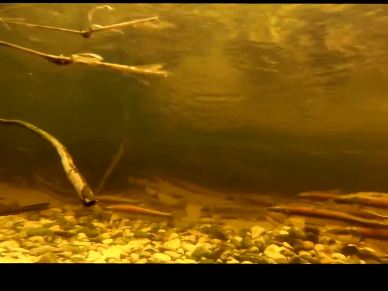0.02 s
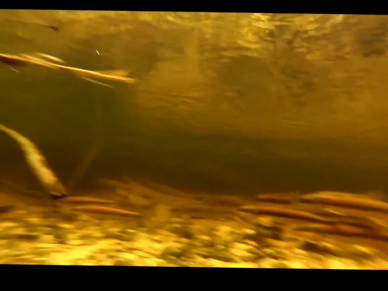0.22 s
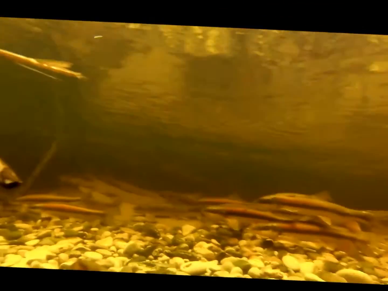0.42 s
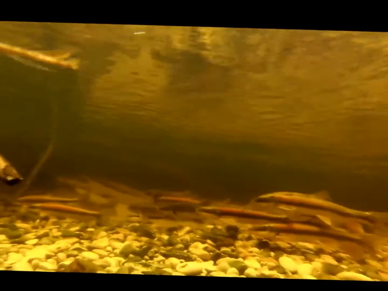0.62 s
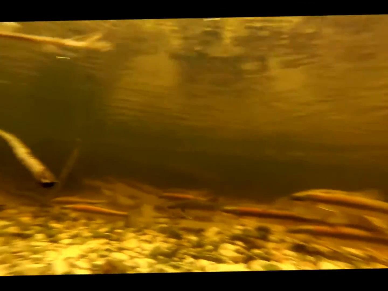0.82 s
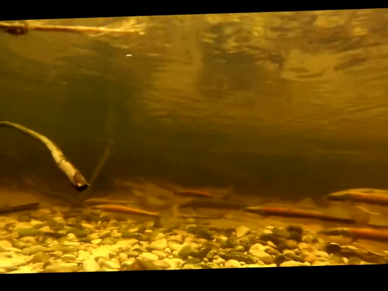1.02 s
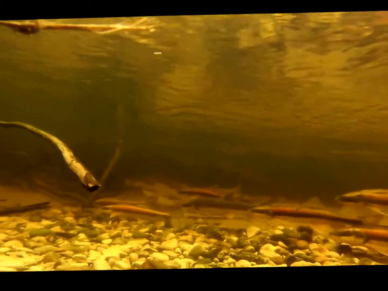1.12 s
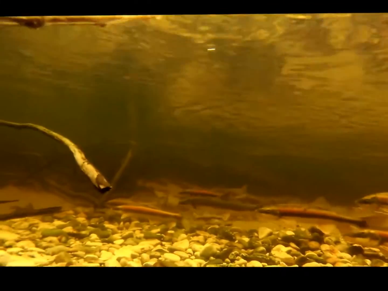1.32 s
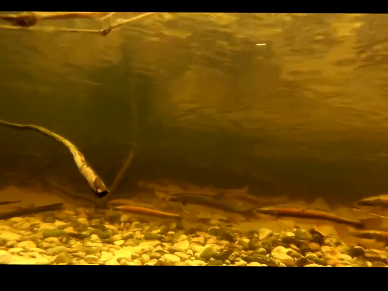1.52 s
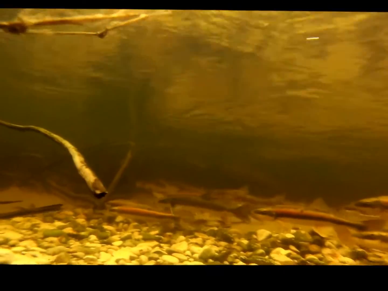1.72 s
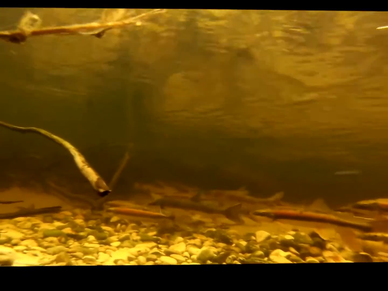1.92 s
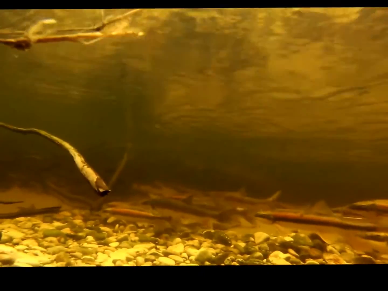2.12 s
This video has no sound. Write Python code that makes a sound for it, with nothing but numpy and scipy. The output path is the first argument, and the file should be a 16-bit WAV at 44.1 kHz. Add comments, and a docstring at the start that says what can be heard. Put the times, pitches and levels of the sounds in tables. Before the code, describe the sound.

Gravel grinds against a microphone case underwater on a creek bed. After a quiet start, sharp pebble knocks and small bubble blips come at about 0.25 seconds, followed by brief scraping. A denser, gritty crunch swells from 0.8 to 1 second, then eases into scattered ticks. A hard knock at 1.7 seconds starts more grinding, fading after 2 seconds. Low water rumble and faint hiss lie underneath.

```python
"""On the gravel bed of a creek, a camera in a watertight case shifts in the current.
Gravel grinds against the case in three surges, pebbles knock on it and sand grains tick.
Each contact is an impulse, coloured by the resonances of the case and smeared by its wall.
Small bubbles ring as damped oscillators, over the low rumble of the water and a faint hiss."""
import sys
import numpy as np
from scipy import signal
from scipy.fft import rfft, irfft
from scipy.io import wavfile
from scipy.ndimage import uniform_filter1d, minimum_filter1d

SR = 44100
rng = np.random.default_rng(int(sys.argv[2]) if len(sys.argv) > 2 else 0)


def file_out(sig):
    """Save sig as 16-bit WAV at sys.argv[1]."""
    # one column per channel
    cols = np.atleast_2d(sig).T
    # limit, then scale
    lim = np.clip(cols, -1, 1)
    pcm = np.round(lim * 32767).astype(np.int16)
    wavfile.write(sys.argv[1], SR, pcm)


N = 97020
TAPS = 4096  # samples in one contact or bubble
HZ, AGE, TIME = np.fft.rfftfreq(TAPS, 1 / SR), np.arange(TAPS) / SR, np.arange(N) / SR
BASS_HZ, TREBLE_HZ = 740, 2960
TREBLE_OCTAVES = np.log2(np.maximum(HZ / TREBLE_HZ, 1))

# surges of grinding (time [s], coarse grain level [dB], fine grit level [dB])
SURGES = [(0, -48.5, -83), (.05, -50.5, -82), (.11, -57.5, -74), (.18, -45.5, -68), (.23, -32.5, -50.5),
          (.37, -29, -51), (.43, -37.5, -63.5), (.47, -45, -57), (.59, -47.5, -66), (.64, -38, -52.5),
          (.73, -40, -56), (.80, -26, -39.5), (.84, -27, -42), (.90, -28.5, -37.5), (.95, -34.5, -64),
          (1.03, -48.5, -64.5), (1.1, -49, -71), (1.19, -37.5, -57.5), (1.26, -46.5, -62), (1.34, -49, -65),
          (1.42, -38.5, -63.5), (1.48, -42, -58), (1.55, -45, -62), (1.605, -41, -54.5), (1.66, -49.5, -69),
          (1.71, -30, -46.5), (1.745, -39, -58), (1.80, -29.5, -50), (1.84, -36.5, -55),
          (1.89, -30.5, -48.5), (1.96, -40.5, -61), (2.05, -46, -61.5), (2.12, -55.5, -66),
          (2.2, -47.5, -69)]
# response of the case to a hard contact (frequency [Hz], level [dB])
CASE_RESPONSE = [(30, -28.5), (190, -6.5), (300, -6), (420, 0.5), (540, -1), (660, 0.5), (920, -4.5),
                 (1110, -2), (1350, -7.5), (1610, 0.5), (1870, -6), (2200, -2.5), (2380, -7), (2580, -17.5),
                 (3000, -17), (3500, -20.5), (4600, -37.5), (5200, -31.5), (6000, -48), (6600, -37.5),
                 (9000, -59.5), (16000, -84)]
# response of the case to sand (frequency [Hz], level [dB])
SAND_RESPONSE = [(300, -22), (2500, 3), (3500, 7.5), (4600, -7), (5200, 2.5), (5950, -5.5), (6550, 1),
                 (7100, -4.5), (7600, -2.5), (8600, -12.5), (9700, -3.5), (10700, -12), (11900, -9),
                 (13200, -23), (14300, -19), (16000, -25)]
# lasting modes of the case (frequency [Hz], level [dB], t60 [s])
CASE_MODES = [(396.3, -6.5, 0.083), (488, -5.5, 0.14), (629, -3.5, 0.058), (810, -6, 0.033),
              (1075, -0.5, 0.069), (1139, 1, 0.027), (1607, -5.5, 0.042), (2180, -2, 0.032),
              (3450, -5.5, 0.019)]


def amp(db):
    """Decibels to amplitude ratio."""
    return 10 ** (np.asarray(db) / 20)


def unit_rms(x):
    """Normalisation to rms 1."""
    return x / np.sqrt(np.mean(x ** 2) + 1e-20)


def colour(points, hz=HZ):
    """A spectrum in dB, interpolated over log frequency."""
    f, db = np.transpose(points)
    return np.interp(np.log(hz + 1), np.log(f + 1), db)


def envelope(table, column=1):
    """An amplitude envelope, interpolated in dB."""
    columns = np.transpose(table)
    return amp(np.interp(TIME, columns[0], columns[column]))


def add(mix, s, sound):
    """Superposition: a sound joins the mix at s seconds."""
    part = mix[max(round(s * SR), 0):][:len(sound)]
    part += sound[:len(part)]


def click(db):
    """Minimum phase gives the shortest causal pulse with this spectrum; peak 1."""
    log_gain = np.log(amp(np.r_[db, db[-2:0:-1]]))
    spectrum = np.exp(np.conj(signal.hilbert(log_gain)))
    pulse = np.fft.ifft(spectrum).real
    return pulse / abs(pulse).max()


def noise(points):
    """Spectral shaping of white noise; rms 1."""
    gain = amp(colour(points, np.fft.rfftfreq(N, 1 / SR)))
    return unit_rms(irfft(rfft(rng.standard_normal(N)) * gain, N))


def case_ring(weights, rise_s=0.00077):
    """Free vibration of the case is a weighted sum of damped modes."""
    modes = sum(weight * amp(db - 60 * AGE / t60) * np.sin(2 * np.pi * hz * AGE)
                for weight, (hz, db, t60) in zip(weights, CASE_MODES))
    return modes * (1 - np.exp(-(AGE / rise_s) ** 2))


def contact_ripple(count=26, spread_db=4):
    """The response varies with the point of contact: a random spectral ripple in dB."""
    return spread_db * colour(np.c_[np.geomspace(150, 16000, count), rng.standard_normal(count)])


def shower(shapes, nominal_per_s, spread_db):
    """Shot noise: randomly drawn shapes arrive faster as the grinding grows louder; rms 1."""
    density = unit_rms(envelope(SURGES) ** .5)
    size = amp(spread_db * np.minimum(rng.exponential(1, N), 3.5)) * rng.choice([-1, 1], N)
    size /= np.sqrt(density)  # keeps mean power independent of the rate
    impulses = size * (rng.random(N) < density * nominal_per_s / SR)
    which = rng.integers(0, len(shapes), N)
    return unit_rms(sum(signal.oaconvolve(impulses * (which == k), shape)[:N]
                        for k, shape in enumerate(shapes)))


def gravel(count=36, ring_db=-24):
    """Friction as many small impacts: coarse grains slip on the case and excite its modes."""
    # colour of coarse grains, added to the case response (frequency [Hz], level [dB])
    grain_colour = [(60, -3), (250, 0.5), (450, -2), (750, 0.5), (1100, 2.5), (1600, -2.5), (2300, 0.5),
                    (3500, -0.5), (7000, -1), (14000, -18)]
    shapes = []
    for _ in range(count):
        contact = click(colour(CASE_RESPONSE) + colour(grain_colour) + contact_ripple())
        ringing = case_ring(rng.standard_normal(len(CASE_MODES)))
        shapes.append(contact + amp(ring_db) * ringing)
    return envelope(SURGES) * shower(shapes, nominal_per_s=3400, spread_db=4)


def grit(count=10, tilt_db_per_octave=-4):
    """Brief impacts have broad spectra: fine grit crackles brightly in the same surges."""
    spectrum_db = colour(SAND_RESPONSE) + tilt_db_per_octave * TREBLE_OCTAVES
    shapes = [click(spectrum_db + contact_ripple()) for _ in range(count)]
    return envelope(SURGES, column=2) * shower(shapes, nominal_per_s=3200, spread_db=8)


def water():
    """Forced and free vibration: the current buffets the case, which rocks after the hardest knocks."""
    # rumble of the water pushing on the case (time [s], level [dB])
    rumble_levels = [(0, -39), (.08, -43), (.19, -47.5), (.245, -32), (.32, -35.5), (.46, -44),
                     (.53, -52.5), (.68, -45.5), (.82, -37), (.92, -36.5), (1.03, -44.5), (1.35, -47.5),
                     (1.66, -45.5), (1.71, -25.5), (1.78, -39), (1.85, -43), (2.03, -40.5), (2.14, -60),
                     (2.2, -43)]
    # spectrum of the rumble (frequency [Hz], level [dB])
    rumble_colour = [(8, -9.5), (25, 1.5), (38, -5), (52, -6), (72, -9.5), (100, -10), (150, -17.5),
                     (300, -27), (1000, -73)]
    # the case rocking on the bed (time [s], level [dB], frequency [Hz], t60 [s])
    rocking = [(0.2464, -21, 55.6, 0.051), (1.705, -29, 29.7, .25)]
    out = envelope(rumble_levels) * noise(rumble_colour)
    for s, db, hz, t60 in rocking:
        add(out, s, amp(db - 60 * TIME / t60) * np.sin(2 * np.pi * hz * TIME))
    return out


def hiss(level_db=-66.5):
    """Stationary broadband noise forms a faint floor."""
    # spectrum of the hiss (frequency [Hz], level [dB])
    hiss_colour = [(100, 12.5), (1500, 5), (4000, -7.5), (7000, -4), (12000, -5.5), (15000, -7),
                   (16000, -24.5)]
    return amp(level_db) * noise(hiss_colour)


def pebbles(cutoff_hz=9000):
    """Impact excitation: soft knocks are bassier, hard ones brighter; a few leave the case ringing."""
    # pebbles striking the case (time [s], level [dB], bass [dB], treble [dB], relative ring [dB])
    knocks = [(.0450, -29, 12.5, -3, -20), (.1260, -37.5, 5, 0, -15), (0.1506, -33, 1, -1.5, -19),
              (0.2216, -14, -5, 1.5, -24.5), (0.2439, -4.5, 14, -2, -36), (0.2454, -4.5, 5, 6.5, -25),
              (.2480, -2, 0.5, 5, -32.5), (0.2512, -8, -6, -22, -11), (0.267, -25, 18, -2, -34.5),
              (0.2893, -10, -24, -6, -16.5), (.2900, 4, 0.5, 0, -30), (0.2944, -10, 4, 13, -13.5),
              (.4372, -13.5, -26, -10, -19), (.6225, -20.5, -4, -3, -29), (0.7587, -15.5, -12.5, -16, -8),
              (.7965, -34, 12.5, 2, -15.5), (0.8236, -12.5, 4, -6, -16), (.8250, -8.5, 3, -4, -15.5),
              (0.8346, -10.5, -10, 2, -11), (0.9278, -13, 3.5, 7, -16.5), (1.0550, -34, -2, 4, -20),
              (1.0603, -32.5, 17, 7, -20), (1.1817, -20, 1, -1, -25), (1.271, -25, 3, -13, -26),
              (1.2939, -29.5, -43, -3, -6), (1.301, -18.5, -3.5, -4, -18), (1.4025, -26, -12, 4, -17),
              (1.4614, -13, 2, 7, -50), (1.4663, -20.5, -17, -5, -19), (1.5925, -26.5, 7, -14, -20),
              (1.6735, -25, 7, 8, -26), (1.6931, 6.5, -0.5, -0.5, -35), (1.6945, -2.5, -5.5, -7, -45.5),
              (1.6975, -14.5, -12, -18, -33), (1.7008, -18, -2, -27, -26), (1.7114, -8.5, 17.5, -20, -30),
              (1.7803, -16.5, -8, 8, -16), (1.7963, -27.5, 8, 2, -4), (1.909, -18.5, -6, -14, -20),
              (1.936, -10, -4.5, -0.5, -33), (1.9424, -13, -0.5, 4, -44), (1.9596, -17.5, -18, -10, -14.5),
              (1.973, -21.5, 9.5, 6, -9.5), (2.018, -22.5, 4, 0, -30), (2.1002, -36, 0, 11, -6.5),
              (2.145, -30, -2.5, -9, -18), (2.177, -28, -3, -3, -35), (2.198, -18, 6.5, -10, -24)]
    out, ringing = np.zeros(N), case_ring(np.ones(len(CASE_MODES)))
    bass_shelf = 1 / (1 + (HZ / BASS_HZ) ** 4)
    treble_shelf = 1 - 1 / (1 + (HZ / TREBLE_HZ) ** 4)
    blunt_db = colour(CASE_RESPONSE) - 10 * np.log10(1 + (HZ / cutoff_hz) ** 8)
    for s, db, bass_db, treble_db, ring_db in knocks:
        contact = click(blunt_db + bass_db * bass_shelf + treble_db * treble_shelf)
        add(out, s, amp(db) * (contact + amp(ring_db) * ringing))
    return out


def sand():
    """Impulse response: each single grain draws a sharp tick from the case."""
    # grains striking the case (time [s], level [dB], treble tilt [dB/octave])
    ticks = [(0.1268, -37, -2.5), (0.2432, -26.5, -5), (.4376, -33, 0), (.4745, -42, 2), (.4810, -47, -3),
             (0.7845, -29, 0), (.8124, -40, 0), (.8314, -22, -0.5), (.8814, -23, -7), (.9056, -28, -7),
             (0.964, -29, -6), (.9761, -23.5, -4.5), (1.4088, -30.5, 14), (1.414, -27, 10.5),
             (1.4676, -27.5, -1.5), (1.6931, -23, 12), (1.726, -30, -5), (1.7586, -33.5, 1),
             (1.778, -26.5, -3), (1.8602, -27.5, -3), (1.9607, -27, -3), (1.9753, -31, 1.5)]
    out = np.zeros(N)
    for s, db, tilt in ticks:
        add(out, s, amp(db) * click(colour(SAND_RESPONSE) + tilt * TREBLE_OCTAVES))
    return out


def bubble(hz, t60, rise_s=0.0005, glide_per_s=1.2):
    """Minnaert resonance: a bubble pulsates as a damped sine, its pitch creeping upward."""
    swell = 1 - np.exp(-(AGE / rise_s) ** 2)
    phase = 2 * np.pi * hz * AGE * (1 + glide_per_s * AGE / 2)
    return swell * amp(-60 * AGE / t60) * np.sin(phase)


def bubbles(count=30, low_hz=416.5, high_hz=1850, t60_cycles=27, relative_db=-12):
    """Stirred gravel frees many faint bubbles and a few distinct ones, each ringing at its resonance."""
    # distinct bubbles breaking free, and at the two loudest plops a short ring of the case near 3.4 kHz (time
    # [s], level [dB], frequency [Hz], t60 [s])
    releases = [(.2450, -15.5, 3420, 0.015), (.2484, -5, 1069, 0.041), (.2550, -18, 282, 0.092),
                (.2893, -11, 3450, 0.011), (.2902, -11, 1075, 0.043), (.2960, -11.5, 562, 0.034),
                (0.4354, -26, 1572, 0.049), (0.6224, -27.5, 1103, 0.076), (1.058, -38.5, 484, 0.076),
                (1.24, -29, 455, 0.043), (2.045, -40, 493, 0.16), (2.049, -35.5, 1076, .06)]
    pitches = low_hz * (high_hz / low_hz) ** rng.random(count)
    shapes = [bubble(hz, t60_cycles / hz) for hz in pitches]
    out = amp(relative_db) * envelope(SURGES) * shower(shapes, nominal_per_s=110, spread_db=5.5)
    for s, db, hz, t60 in releases:
        add(out, s, amp(db) * bubble(hz, t60))
    return out


def inside_case(x, slow_hz=1240, width_hz=920, echo_db=-11, echo_t60_s=0.027):
    """Dispersion and reverberation: the wall delays one band, and dense reflections follow inside."""
    radius = np.exp(-np.pi * width_hz / SR)
    poles = np.array([1, -2 * radius * np.cos(2 * np.pi * slow_hz / SR), radius * radius])
    smeared = signal.lfilter(poles[::-1], poles, x)  # all-pass
    tail = rng.standard_normal(TAPS) * amp(-60 * AGE / echo_t60_s)
    reflections = signal.oaconvolve(smeared, tail / np.linalg.norm(tail))[:N]
    return smeared + amp(echo_db) * reflections


def scene():
    """Superposition of the contacts, heard through the case, with bubbles, rumble and hiss."""
    contacts = gravel() + grit() + pebbles() + sand()
    return (inside_case(contacts) + bubbles() + water() + hiss())[None]


def record(dry, ceiling=.97, smoothing_s=.0012, cutoff_hz=15500):
    """Peak limiting holds down the hardest knocks; a low-pass filter then bounds the bandwidth."""
    size = round(smoothing_s * SR)
    gain = minimum_filter1d(ceiling / np.maximum(abs(dry), ceiling), 2 * size)
    limited = dry * uniform_filter1d(uniform_filter1d(gain, size), size)
    lowpass = signal.firwin(511, cutoff_hz, window=("kaiser", 9), fs=SR)
    return signal.oaconvolve(limited, lowpass[None], "same")


dry = scene()
out = record(dry)
file_out(out)
```